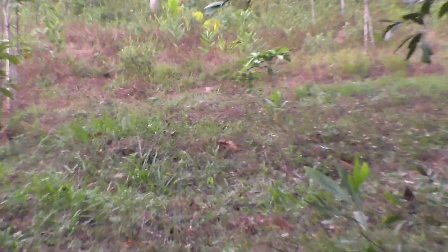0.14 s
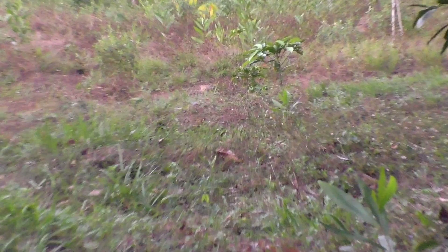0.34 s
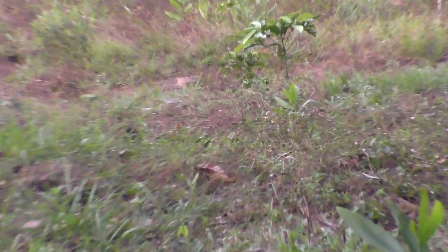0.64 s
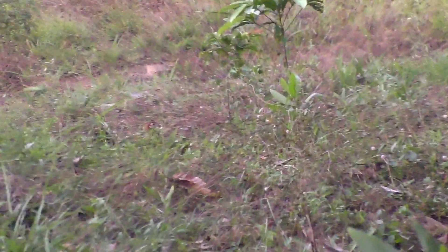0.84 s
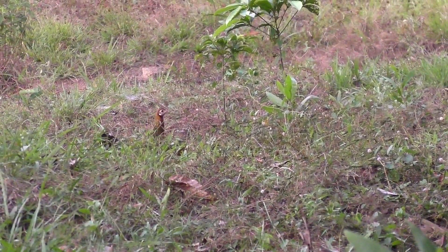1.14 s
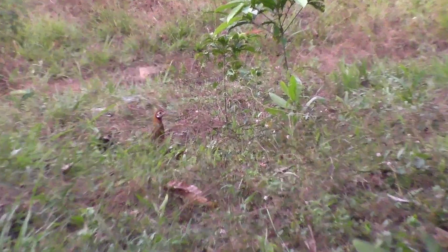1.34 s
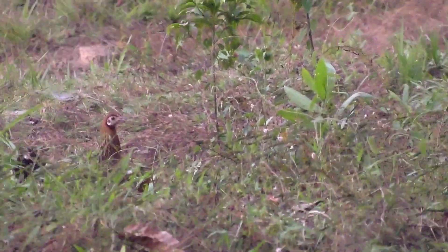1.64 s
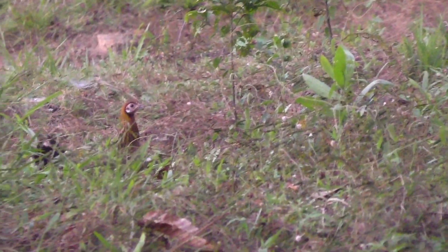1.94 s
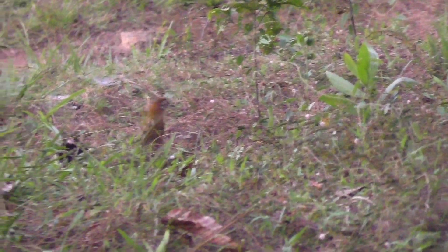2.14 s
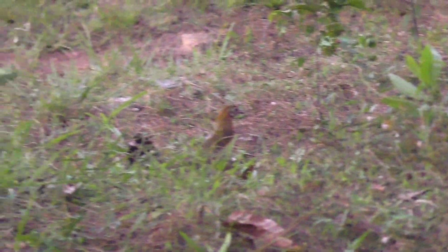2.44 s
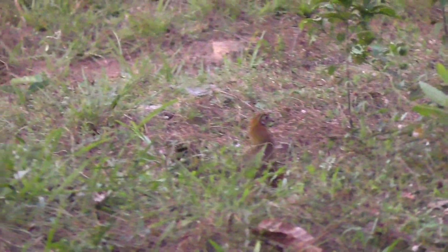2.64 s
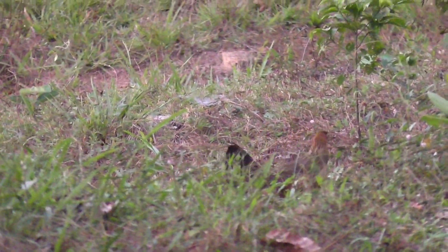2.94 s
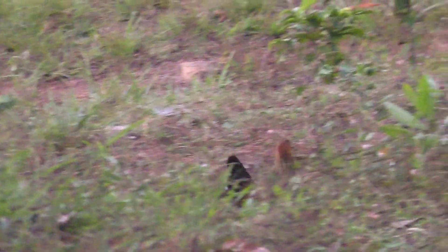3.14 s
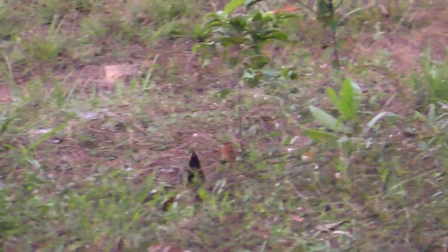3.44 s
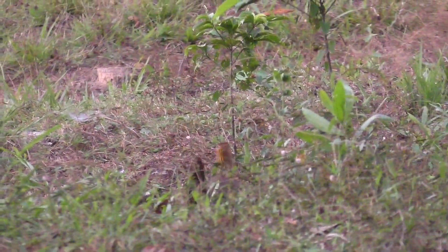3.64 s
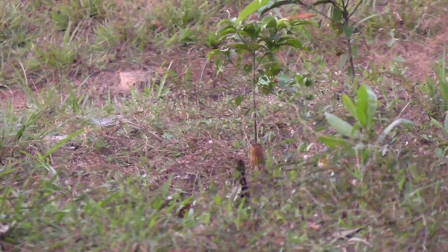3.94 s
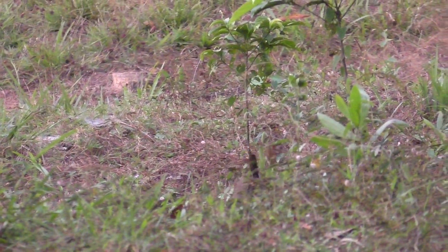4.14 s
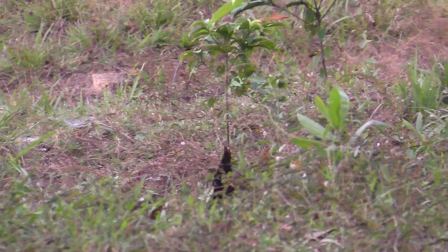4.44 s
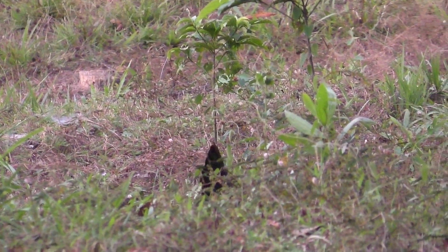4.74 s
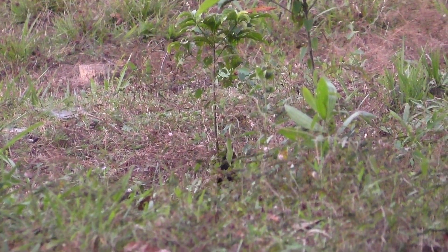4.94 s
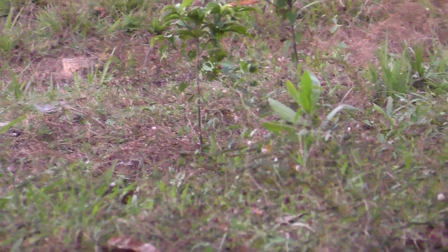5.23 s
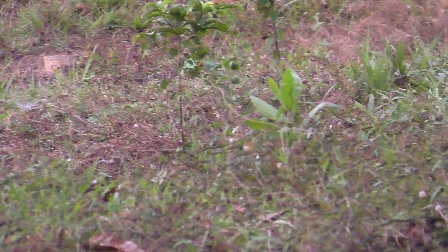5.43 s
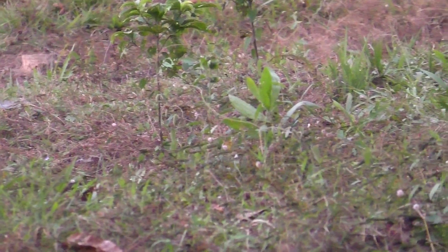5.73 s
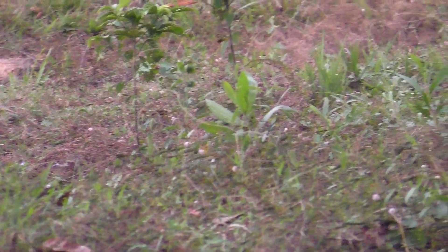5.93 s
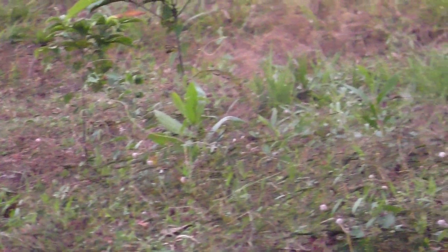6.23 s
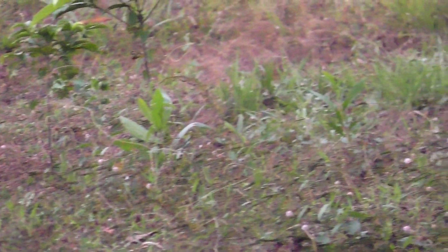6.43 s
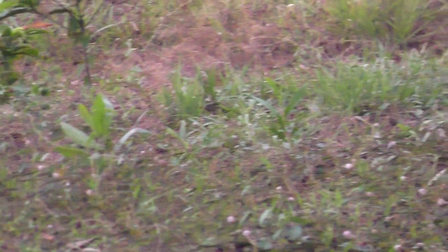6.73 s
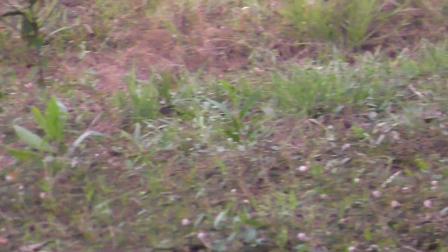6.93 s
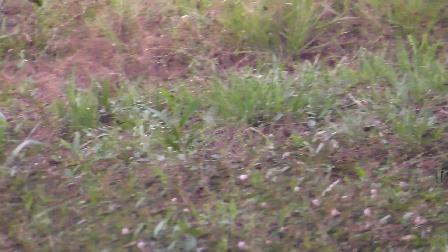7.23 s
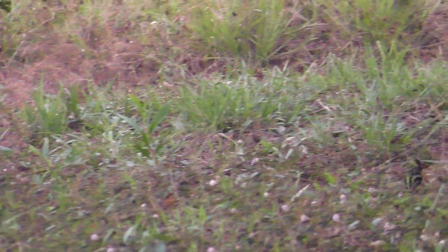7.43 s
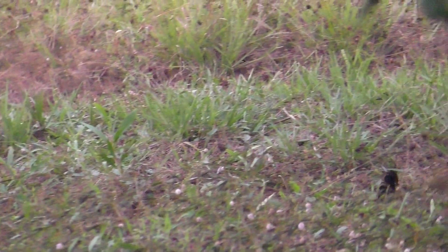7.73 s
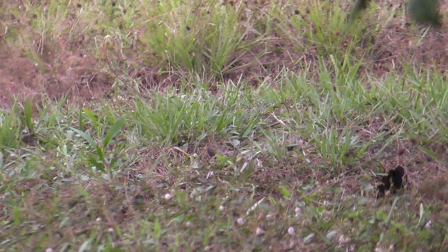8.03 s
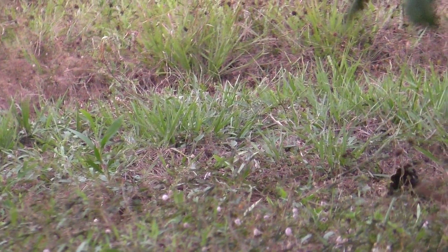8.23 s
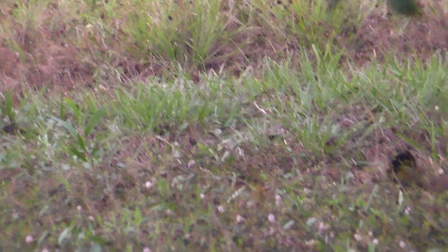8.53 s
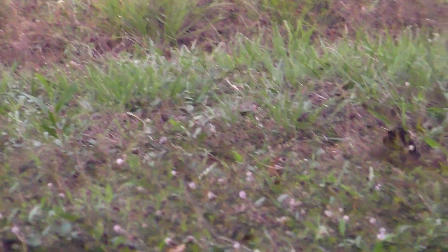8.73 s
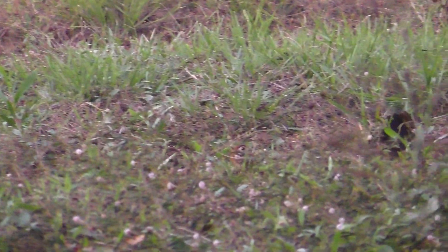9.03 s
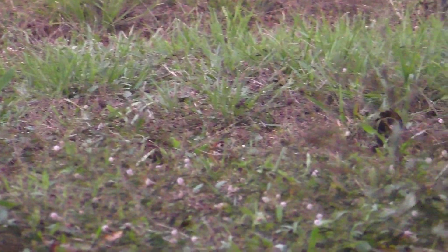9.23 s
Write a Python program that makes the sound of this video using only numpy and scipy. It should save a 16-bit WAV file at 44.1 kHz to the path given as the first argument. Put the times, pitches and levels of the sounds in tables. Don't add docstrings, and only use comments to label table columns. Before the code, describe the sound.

Outdoor insect chorus, bright and steady, with gentle early clucking, faint dove coos, zoom-motor noise and a low distant engine rumble.

```python
import sys
import numpy as np
from scipy import signal
from scipy.fft import rfft, irfft
from scipy.io import wavfile

SR = 44100
rng = np.random.default_rng(int(sys.argv[2]) if len(sys.argv) > 2 else 0)


def generate_wav(sig):
    pcm = np.round(np.clip(np.atleast_2d(sig).T, -1, 1) * 32767).astype(np.int16)
    wavfile.write(sys.argv[1], SR, pcm)


def magnitude_from_level(level_db):
    exponent = np.asarray(level_db, float) / 20
    return 10 ** exponent


N = 413196
T = np.arange(N) / SR
BINS = np.maximum(np.arange(N // 2 + 1) * SR / N, 1)

# first_scrape_s, scrape_db, buzz_db
SWEEPS = [(.055, -60, -54), (.29, -61, -56), (1.26, -70, -66), (1.555, -60, -63), (1.849, -60, -63),
          (2.067, -58, -66), (2.282, -60, -67), (2.506, -58, -67), (2.722, -57, -66), (2.977, -58, -63),
          (3.243, -61, -63), (3.492, -61, -66), (3.768, -60, -65), (4.033, -59, -62), (4.28, -63, -65),
          (4.9, -70, -64), (6.22, -70, -65), (6.51, -70, -64), (6.88, -60, -56), (7.11, -60, -56),
          (7.338, -58, -54), (7.55, -61, -59), (7.822, -63, -65), (8.085, -56, -72), (8.347, -57, -72),
          (8.606, -57, -65), (9.04, -70, -66)]
SCRAPE_S = 0.0405


def rms_one(x):
    return x / np.sqrt(np.mean(x ** 2) + 1e-20)


def in_time(rows):
    s, *columns = np.transpose(rows)
    return [np.interp(T, s, c) for c in columns]


def at_hz(points, column=1):
    points = np.array(points)
    return np.interp(np.log(BINS), np.log(points[:, 0]), points[:, column])


def drift(hz):
    r = np.exp(-2 * np.pi * hz / SR)
    noise = rng.standard_normal(N + SR)
    return rms_one(signal.lfilter([1], [1, -2 * r, r * r], noise)[SR:])


def turning(hz):
    return 2 * np.pi * np.cumsum(hz) / SR


def peak(hz, width):
    return 1 / (1 + ((BINS - hz) / (0.5 * width)) ** 2)


def port_noise(gain):
    # pitch_hz, likeness_0_to_1, left_lead_rad
    ports = [(80, .1, .7), (170, .3, .7), (430, .35, .8), (520, .1, 0), (600, .35, -2.3), (780, .55, -3),
             (950, .45, -4.5), (1050, .35, -5.3), (1500, .3, -6.28), (2700, .4, -6.28), (3600, .05, -6.28),
             (5300, .8, -6.28), (7500, .96, -6.28), (9600, .8, -6.28), (11500, .6, -6.28),
             (13000, .3, -6.28), (15000, .1, -6.28)]
    alike = at_hz(ports)
    turn = np.exp(1j * at_hz(ports, column=2))
    shared, left, right = rfft(rng.standard_normal((3, N)))
    common = np.sqrt(alike) * shared * np.array([turn, np.ones_like(turn)])
    separate = np.sqrt(1 - alike) * np.array([left, right])
    return rms_one(irfft(gain * (common + separate), N))


def spells(rows, idle_db, edge_s):
    gain = magnitude_from_level(idle_db)
    for start, end, db in rows:
        gain = gain + magnitude_from_level(db) * np.clip(np.minimum(T - start, end - T) / edge_s + 0.5, 0, 1)
    return gain


def bumps(rows, width_s):
    coarse = T[::64]
    return np.interp(T, coarse, sum(h * np.exp(-0.5 * ((coarse - s) / width_s) ** 2) for s, h in rows))


def add(out, start, shape, db, overtone_db=-60, wobble=0.0):
    s, hz, level = np.transpose(shape)
    t = np.arange(s[0], s[-1], 1 / SR)
    cycles = np.cumsum(np.interp(t, s, hz)) * (1 + wobble) / SR
    phase = 2 * np.pi * (cycles + rng.random())
    wave = np.sin(phase) + magnitude_from_level(overtone_db) * np.sin(2 * phase)
    tone = magnitude_from_level(db + np.interp(t, s, level)) * wave
    i = round((start + s[0]) * SR) + np.arange(len(t))
    inside = (i >= 0) & (i < N)
    out[i[inside]] += tone[inside]


def woods(x, wet_db, t60, apart_db=-4):
    t = np.arange(int(t60 * SR)) / SR
    scatter = rng.standard_normal((3, SR // 2))[:, :len(t)]
    tail = scatter[0] + magnitude_from_level(apart_db) * scatter[1:]
    tail = tail * magnitude_from_level(-60 * t / t60) * np.minimum(t / 0.01, 1)
    tail = tail / np.sqrt(np.sum(tail ** 2, axis=1, keepdims=True))
    return x + magnitude_from_level(wet_db) * signal.fftconvolve(x[None], tail, axes=1)[:, :N]


def chirping_cricket():
    # start_s, peak_db
    chirps = [(0.051, -45.5), (0.283, -45), (0.4954, -48.5), (0.777, -47), (1.016, -47.5), (1.289, -47),
              (1.522, -46), (1.958, -46.5), (2.177, -45.5), (2.742, -45.5), (2.9565, -46), (3.4866, -45.5),
              (3.703, -46.5), (4.257, -45), (4.473, -45.5), (5.0075, -45), (5.2252, -45.5), (5.771, -45),
              (5.988, -45), (6.525, -45.5), (6.7417, -46), (7.2898, -46), (7.51, -46.5), (8.014, -45.5),
              (8.2304, -47), (8.7673, -46.5), (8.986, -46.5)]
    # time_s, pitch_hz, level_db
    chirp_shape = [
        (0, 6970, -30),
        (.006, 6955, -10),
        (.016, 6955, -4.5),
        (.038, 6952, -4.5),
        (.052, 6943, 0),
        (.058, 6930, -2),
        (.063, 6930, -9),
        (.070, 6880, -10),
        (.078, 6760, -26),
    ]
    # lag_s, level_db
    echoes = [
        (0.032, -11),
        (.052, -29),
    ]
    # time_s, pitch_hz, level_db
    snap = [
        (.044, 6940, -14),
        (.052, 6930, 0),
        (.058, 6880, -3),
        (.064, 6780, -16),
    ]
    out = np.zeros(N)
    for s, db in chirps:
        add(out, s, chirp_shape, db + 9.5, wobble=rng.normal(0, 0.0005))
        for lag, loss_db in echoes:
            add(out, s + lag, snap, db + 10.5 + loss_db + rng.normal(0, 2))
    teeth = magnitude_from_level(0.9 * drift(120))
    return woods(out * teeth, wet_db=-14, t60=0.3)


def trilling_cricket():
    # first_stroke_s, end_s, strokes_per_s
    trills = [(.0087, .92, 35.53), (.9362, 1.74, 35.46), (1.750, 2.72, 35.59), (2.7886, 3.54, 35.62),
              (3.6307, 3.87, 36.03), (3.9233, 5.03, 35.53), (5.0479, 6.01, 35.66), (6.031, 7.02, 35.52),
              (7.0439, 7.81, 35.54), (7.8321, 8.575, 35.39), (8.899, 9.02, 35.0), (9.233, 9.36, 35.0)]
    # time_s, pitch_hz, level_db
    stroke = [
        (-.007, 5420, -24),
        (-.0052, 5520, -6),
        (-.003, 5760, -4),
        (0, 5880, 0),
        (.004, 5920, -1),
        (.007, 5930, -22),
    ]
    out = np.zeros(N)
    for start, end, rate in trills:
        for s in np.arange(start, end, 1 / rate):
            late, db = rng.normal(0, 0.0004), -50.5 + rng.normal(0, 1.2)
            add(out, s + late, stroke, db, overtone_db=-16, wobble=rng.normal(0, 0.002))
    return woods(out, wet_db=-10, t60=0.12)


def whining_cricket():
    # start_s, end_s
    whines = [
        (0, 0.14),
        (0.71, 1.46),
        (2.07, 2.81),
        (3.45, 4.23),
        (4.85, 5.63),
        (6.21, 6.97),
        (7.61, 8.42),
        (9.05, 9.4),
    ]
    stroke = turning(75.4 * (1 + 0.006 * drift(5.1)))
    hz = 6320 + 30 * np.sin(stroke - 1.0) + 12 * drift(21.5)
    beat = 1 + 0.45 * np.cos(stroke + 0.6) + 0.65 * np.cos(0.5 * stroke)
    notes = magnitude_from_level(-56) * sum(np.clip(np.minimum(T - a, b - T) / 0.013, 0, 1) for a, b in whines)
    tone = notes * beat * magnitude_from_level(0.89 * drift(6.7)) * np.sin(turning(hz))
    return woods(tone, wet_db=-7.5, t60=0.069)


def peeping_cricket():
    # start_s, level_db
    peeps = [(.31, -42), (.595, -40), (.78, -39), (0.946, -39), (1.141, -42), (1.713, -38), (1.901, -37.5),
             (2.446, -38), (2.63, -37.5), (3.288, -41), (3.472, -38), (4.088, -37.5), (4.29, -40),
             (4.89, -38), (5.083, -35), (5.7, -37), (5.892, -38), (6.509, -38), (6.689, -36.5), (7.28, -43),
             (8.325, -40), (8.591, -48)]
    out = np.zeros(N)
    for s, db in peeps:
        add(out, s, [(0, 6240, -17), (0.012, 6090, -14), (0.028, 6040, -10), (0.045, 6230, -18)], db - 0.5)
    return woods(out, wet_db=-7, t60=0.2)


def katydid():
    scrape = [(-0.01, 4900, -14), (-0.004, 4770, -2), (0.008, 4480, 0), (0.016, 4280, -3), (0.022, 4150, -14)]
    out = np.zeros(N)
    for s, db, _ in SWEEPS:
        for k in range(3):
            add(out, s + k * SCRAPE_S, scrape, db + 1.5 + rng.normal(0, 1), wobble=rng.normal(0, 0.004))
    return woods(out * magnitude_from_level(1.5 * drift(200)), wet_db=-14, t60=0.15, apart_db=-4)


def bush_cricket():
    # time_s, level_db; the rows from 7.6 s on are far katydid buzz
    puffs = [(.065, -57), (.103, -48), (.31, -54), (.352, -53), (6.885, -51), (6.925, -56), (7.135, -58),
             (7.175, -49), (7.375, -56), (7.42, -55), (7.6, -66), (7.66, -62), (7.76, -61)]
    return bumps([(s, magnitude_from_level(db)) for s, db in puffs], width_s=0.012) * port_noise(peak(4760, 300) ** 2)


def frog():
    # start_s, top_hz, level_db
    rasps = [(3.549, 1620, -57.5), (3.769, 1930, -56.5), (4.005, 1913, -53.5), (4.244, 1920, -53),
             (4.495, 1903, -52), (4.736, 1916, -51), (4.989, 1867, -51.5), (5.243, 1870, -51.5),
             (5.499, 1870, -50), (5.748, 1847, -53.5), (5.988, 1870, -54), (6.2, 1810, -54.5),
             (6.441, 1800, -57.5), (6.661, 1756, -58)]
    overtones = [(1.0, -4.0), (0.885, -10.0), (0.78, -11.5), (0.93, -16.0)]
    gulp = [(0, 1377, -19), (0.012, 1257, 0), (0.03, 1120, -13)]
    out = np.zeros(N)
    for s, hz, db in rasps:
        slow = 1 + 2 * np.clip((s - 5.7) / 0.16, 0, 1)
        add(out, s - 0.03, gulp, db - 6.5)
        slide = [(0, hz * 1.1, -13), (0.01, hz * 0.96, 1.5),
                 (0.017 * slow, hz * 0.9, -3), (0.036 * slow, hz * 0.77, -10)]
        add(out, s - 0.003, slide, db)
        for k, (share, level_db) in enumerate(overtones):
            tone = hz * share
            shape = [(0.006, tone * 1.03, -14), (0.022, tone * 1.01, -1), (0.045, tone * 0.975, -1),
                     (0.0743 + 0.023 * k, tone * 0.85, -6), (0.12 + 0.022 * k, tone * 0.84, -13)]
            tone_db = db + level_db + 0.6 - 1.5 * (slow - 1)
            add(out, s + 0.006 * k * slow, shape, tone_db, wobble=rng.normal(0, 0.0109))
    pulses = magnitude_from_level(1.7 * drift(90))
    to_the_right = magnitude_from_level([[-2.5], [1.5]])
    return woods(out * pulses, wet_db=1.5, t60=0.24, apart_db=3) * to_the_right


def hens():
    # start_s, length_s, start_hz, end_hz, level_db
    clucks = [(0.04, 0.053, 970, 910, -50), (0.17, 0.04, 1283, 1390, -55.5),
              (0.208, 0.063, 1383, 1230, -56), (0.212, 0.025, 960, 960, -55),
              (0.261, 0.051, 1073, 1015, -52.5), (0.445, 0.063, 892, 900, -51),
              (1.2, 0.029, 1210, 1180, -56), (1.291, 0.028, 1130, 1070, -59),
              (1.365, 0.035, 1200, 1270, -52), (1.405, 0.022, 1230, 1240, -61),
              (1.455, 0.037, 1170, 1210, -57.5), (1.5, .045, 1196, 1184, -57),
              (1.626, 0.027, 900, 970, -48), (1.67, 0.054, 960, 990, -51), (1.66, 0.033, 785, 797, -48),
              (1.991, 0.059, 1720, 1770, -58.5), (2.052, 0.03, 1150, 1430, -59),
              (2.093, 0.041, 1380, 1460, -55), (2.154, 0.033, 1760, 1740, -52),
              (2.202, 0.06, 1720, 1760, -59), (2.482, 0.03, 2200, 2320, -60),
              (2.69, 0.062, 1500, 1570, -59), (2.327, 0.04, 2230, 1990, -54),
              (2.605, 0.056, 1110, 1306, -58), (2.646, 0.036, 1780, 1870, -56),
              (2.673, 0.1, 1270, 1340, -60), (2.807, 0.047, 1070, 1330, -55.5),
              (2.85, 0.031, 1690, 1900, -54), (2.89, 0.073, 1550, 1480, -60)]
    out = np.zeros(N)
    for s, length, a_hz, c_hz, db in clucks:
        middle_hz = a_hz + 0.18 * (c_hz - a_hz)
        shape = [(0, a_hz, -14), (0.26 * length, a_hz, -3), (0.5 * length, middle_hz, -1),
                 (0.75 * length, c_hz, 0), (length, c_hz, -16)]
        add(out, s, shape, db + 0.5, overtone_db=-34)
    hoarse = magnitude_from_level(2.5 * drift(60) - 2)
    return woods(out * hoarse, wet_db=-3, t60=0.3, apart_db=0)


def lever_ticks():
    # time_s, peak_db, brightness_db
    ticks = [(.9010, -38, -12), (0.9047, -18.5, -20), (.9063, -29, 0), (0.9074, -23, -7), (.9098, -35, -14),
             (.9125, -34, -14), (.9165, -38, -12), (1.6982, -30, -18), (1.6999, -16, -20),
             (1.7012, -21, -6), (1.7025, -26, -6), (1.7044, -33, -10), (1.7062, -33, -13),
             (1.7105, -40, -14), (3.1156, -58, 21), (8.1226, -63, 22)]
    # pitch_hz, level_db, t60_s
    casing = [(375, -19, .03), (700, -26, .025), (1075, -9.5, .024), (1480, -2, .011), (1840, -1.5, .008),
              (2280, -1.5, .007), (2700, -6, .007), (3410, -6.5, .006), (4230, -10, .005),
              (5200, -10, .005), (7700, -12, .005)]
    out, t = np.zeros((2, N)), np.arange(SR // 20) / SR
    crack_band = signal.butter(1, [1500, 10000], "band", fs=SR)
    for s, db, bright_db in ticks:
        rings = np.zeros((2, len(t)))
        for hz, level, t60 in casing:
            decay = magnitude_from_level(level + rng.normal(0, 1.5, (2, 1)) - 60 * t / t60)
            rings += decay * np.sin(2 * np.pi * hz * t + rng.normal(0, 0.5, (2, 1)))
        crack = rng.standard_normal((2, len(t))) + 3.2 * rng.standard_normal(len(t))
        crack = magnitude_from_level(bright_db - 7 - 60 * t / 0.006) * signal.lfilter(*crack_band, crack)
        i = round(s * SR)
        out[:, i:i + len(t)] += magnitude_from_level(db - 2) * (rings * np.minimum(t / 0.00072, 1) + crack)
    return out


def zoom_motor():
    # start_s, end_s, level_db
    zooms = [
        (0, .88, -69.5),
        (1.36, 1.7, -66),
        (2.2, 2.6, -80),
        (3.13, 3.52, -70.5),
        (6.0, 7.4, -81),
    ]
    # start_s, end_s, level_db
    whirs = [
        (0, .9, -84),
        (2.18, 2.75, -72),
        (2.93, 3.15, -70),
        (5.3, 5.95, -80),
        (6.1, 7.35, -72.5),
    ]
    steps = magnitude_from_level(4.0 * np.cos(2 * np.pi * 30.3 * T + 0.18))
    shake = rms_one(irfft(rfft(rng.standard_normal(N)) * peak(742, 88), N)) * steps
    run = spells(zooms, idle_db=-75, edge_s=0.027) * magnitude_from_level(10.5 + 2.0 * drift(30))
    whine = np.sin(turning(1948 + 3 * drift(5.66))) + 0.68 * port_noise(peak(1902, 63))
    return run * shake * np.array([[-0.7], [1.2]]) + spells(whirs, idle_db=-72, edge_s=0.076) * whine


def dove():
    # start_s, level_db
    coos = [
        (.4, -68.5),
        (1.049, -68),
        (1.301, -66.5),
        (1.619, -67),
        (1.921, -65.5),
        (2.218, -67),
        (2.55, -67.5),
        (2.881, -71),
        (5.749, -67),
        (6.13, -69),
    ]
    hz = 373.2
    shape = [(0, hz * 0.969, -9), (0.04, hz, 1), (0.09, hz, 3), (0.14, hz * 1.1, -19)]
    out = np.zeros(N)
    for s, db in coos:
        add(out, s, shape, db + 6.0, wobble=rng.normal(0, 0.013))
    return woods(out, wet_db=-8.0, t60=0.42, apart_db=-13)


def far_hens():
    # start_s, end_s, level_db
    murmurs = [
        (2.0, 3.6, -64),
        (7.7, 8.3, -83),
    ]
    throat = peak(1080, 160) + peak(1480, 320) + peak(1806, 140)
    return spells(murmurs, idle_db=-100, edge_s=0.092) * magnitude_from_level(2.7 * drift(24)) * port_noise(throat ** 2)


def tree_crickets():
    # time_s, depth_db
    pauses = [(0.07, 4), (0.234, 6), (0.429, -1), (0.59, 7), (0.76, 3), (1.0, 3.1), (1.313, 6),
              (1.517, 4.0), (1.662, 5), (1.88, 3.1), (2.05, 6.6), (2.249, 3.0), (2.413, 4), (2.626, 1),
              (2.757, 2), (2.943, 0.5), (3.113, 9), (3.297, 1), (3.429, 11), (3.626, 1), (3.771, 9),
              (4.111, 4.6), (4.317, 0.5), (4.481, 15), (4.662, 2.6), (4.85, 11), (5.039, 2.5), (5.229, 6.1),
              (5.41, 2.1), (5.578, 7), (5.744, 2.5), (5.918, 4), (6.263, 8), (6.451, 1.5), (6.624, 7),
              (6.828, 4), (7.036, 9), (7.206, 6), (7.388, 5), (7.576, 8), (7.735, 8), (7.916, 5), (8.1, 12),
              (8.433, 11), (8.599, 3.3), (8.782, 9), (9.009, 2.9), (9.166, 6)]
    flutter = 3.1 * np.sin(turning(58 + 3 * drift(3.05)))
    line = np.sin(turning(2708 + 26 * drift(14.0))) * magnitude_from_level(1.2 * drift(7.5) + flutter)
    haze = port_noise(peak(2713, 170) ** 2 + 0.35 * peak(2813, 280) ** 2)
    dips_db = bumps([(s, -1.14 * depth) for s, depth in pauses], width_s=0.017)
    return magnitude_from_level(-57.5 + 0.8 + dips_db + np.array([[0.4], [-0.4]])) * (1.5 * line + haze)


def far_katydids():
    pulses = magnitude_from_level(1.4 * np.sin(turning(25 + 3 * drift(2.13))) + 0.77 * drift(220))
    buzz_swells = bumps([(s + SCRAPE_S, magnitude_from_level(db - 2.0)) for s, _, db in SWEEPS], width_s=0.06)
    return (magnitude_from_level(-68) + buzz_swells) * pulses * port_noise(peak(4613, 92) ** 2 + 0.73 * peak(4450, 820) ** 2)


def cicadas():
    # pitch_hz, db_per_hz
    fizz_spectrum = [(7600, -18), (8300, -10.5), (9000, -4), (9900, -6.5), (10400, -10), (10900, -37)]
    flutter = magnitude_from_level(0.67 * np.sin(turning(110 + 4 * drift(1.5))) + 0.5 * drift(3.2))
    sway = magnitude_from_level(-56 + 0.35 * drift(0.29) + np.array([[0.4], [-0.4]]))
    return sway * flutter * port_noise(magnitude_from_level(at_hz(fizz_spectrum)))


def blurred_crickets():
    # pitch_hz, width_hz, level_db
    blur = [(2553, 120, -66.5), (5428, 296, -59.5), (6080, 150, -64), (6625, 280, -62.5), (6720, 25, -71),
            (6860, 300, -68.5)]
    return sum(magnitude_from_level(db + 1.8 * drift(5)) * port_noise(peak(hz, 2.1 * width) ** 2) for hz, width, db in blur)


def distant_engine():
    # time_s, firings_per_s, load_db
    engine = [(0, 29.6, 0), (.9, 30.5, 1.5), (1.5, 30.6, -.5), (2.2, 30.7, -1.5), (3.1, 30.6, -1.5),
              (3.9, 29.7, -3.5), (4.2, 29.4, -1), (5, 30.4, .5), (6.3, 31.6, .5), (7.7, 32.5, 1),
              (8.6, 33.1, 1), (9.37, 33.4, 1)]
    # multiple, level_db
    orders = [(4, -76), (5, -65), (6, -64.5), (7, -73), (8, -71.5), (9, -72.5), (10, -73), (11, -70.5),
              (12, -73.5), (13, -75.5), (14, -81)]
    # time_s, rise_db
    surges = [
        (.8, 5),
        (1.5, 2.5),
        (6.7, 0),
        (8.7, 0.5),
    ]
    # pitch_hz, db_per_hz
    rumble_spectrum = [(15, -37), (25, -17), (54, -8), (102, -7.5), (152, -5.5), (197, -6.5), (222, -5),
                       (346, -4.5), (559, -13.5), (1050, -10.5), (1300, -18.5), (1690, -37), (2860, -120)]
    speed, load_db = in_time(engine)
    turns = turning(speed * (1 + 0.002 * drift(2.5)))
    effort_db = load_db + bumps(surges, width_s=0.072) + 1.5
    hum = np.zeros((2, N))
    for k, db in orders:
        sway_db = 2.0 * np.array([drift(2.2), drift(4.5)])
        phase = k * turns + 0.6 * drift(1.5) + np.array([[1.2], [0]])
        hum += magnitude_from_level(db + effort_db + sway_db) * np.cos(phase)
    beat = magnitude_from_level(magnitude_from_level(load_db) * np.cos(turns))
    rumble = magnitude_from_level(-52.5 - 5.5 + 0.89 * drift(0.72)) * beat * port_noise(magnitude_from_level(at_hz(rumble_spectrum)))
    return hum + rumble


def leaves_and_hiss():
    # pitch_hz, db_per_hz
    air = [(900, -23), (1300, 2.5), (2200, -2), (3000, 3.5), (3350, -6.5), (3900, -13), (5000, -13.5),
           (6500, 0), (7300, -3), (8000, -23.5), (10800, -5.5), (12500, -8.5), (15500, -8)]
    return magnitude_from_level(-57.0 + 0.5 * drift(12.0)) * port_noise(magnitude_from_level(at_hz(air)) * (BINS > 700))


def scene():
    crickets = chirping_cricket() + trilling_cricket() + whining_cricket() + peeping_cricket()
    singers = crickets + katydid() + bush_cricket() + frog() + hens()
    camera = lever_ticks() + zoom_motor()
    far_chorus = tree_crickets() + far_katydids() + cicadas() + blurred_crickets()
    return singers + camera + dove() + far_hens() + far_chorus + distant_engine() + leaves_and_hiss()


def low_pass(x):
    return signal.sosfilt(signal.butter(12, 16460, fs=SR, output="sos"), x)


def record(dry):
    mix = irfft(rfft(dry) * (BINS < 15500), N)
    return low_pass(mix)


dry = scene()
out = record(dry)
generate_wav(out)
```